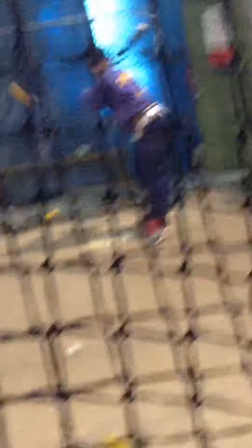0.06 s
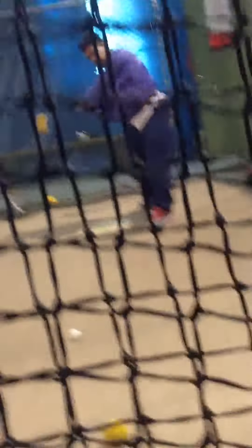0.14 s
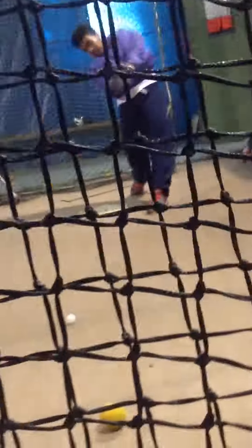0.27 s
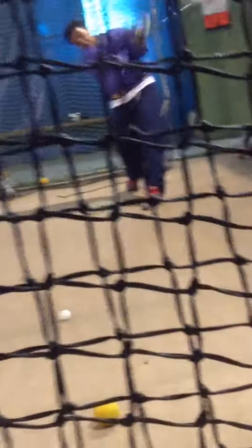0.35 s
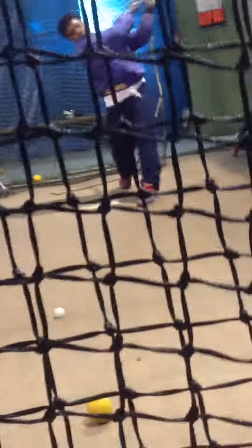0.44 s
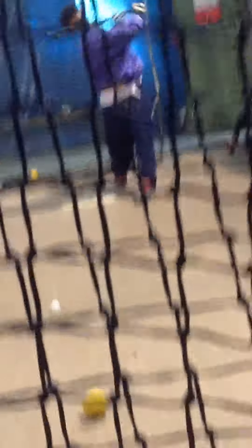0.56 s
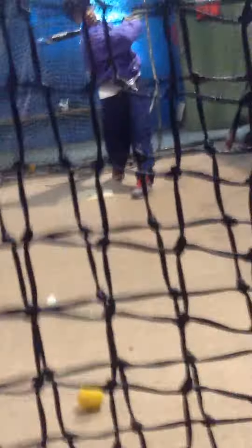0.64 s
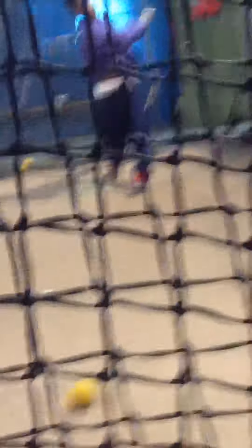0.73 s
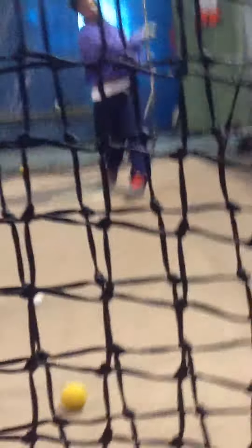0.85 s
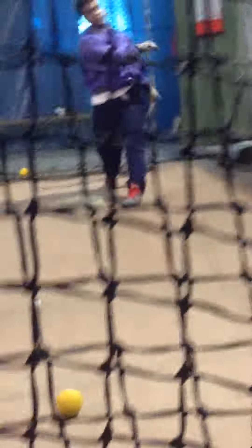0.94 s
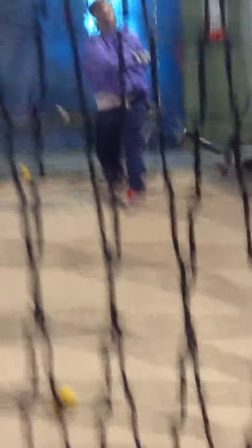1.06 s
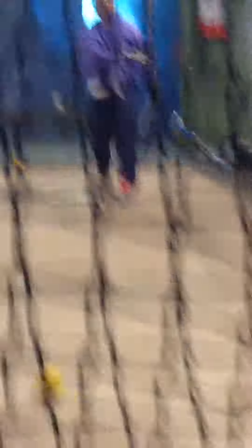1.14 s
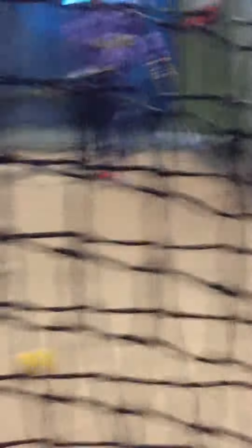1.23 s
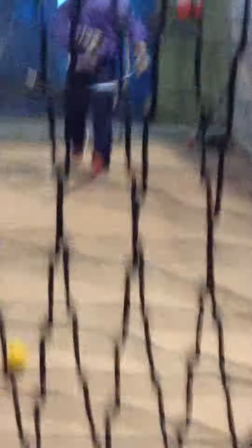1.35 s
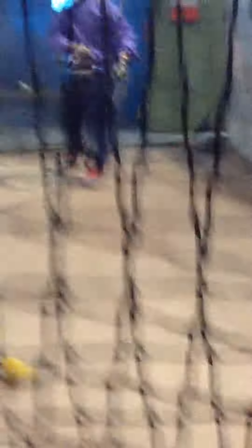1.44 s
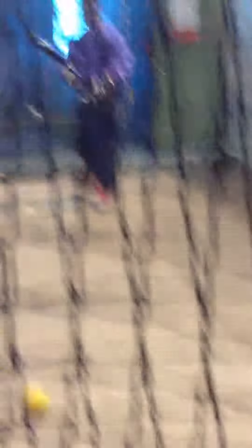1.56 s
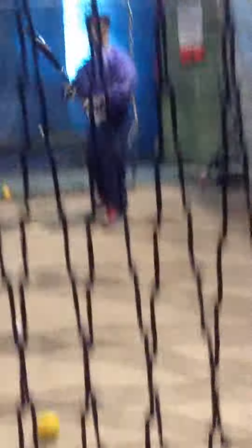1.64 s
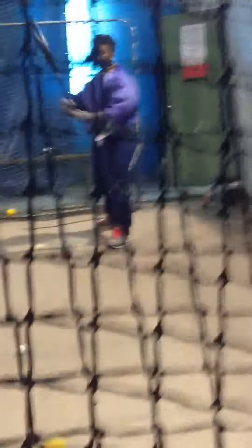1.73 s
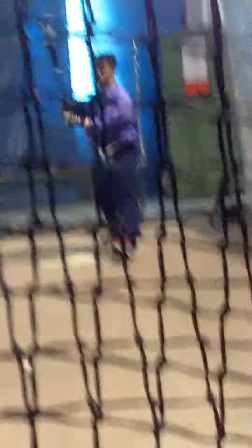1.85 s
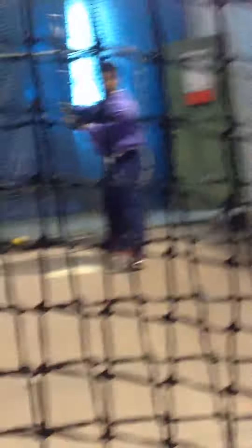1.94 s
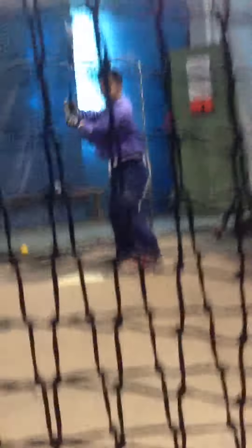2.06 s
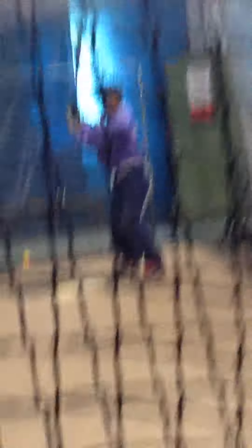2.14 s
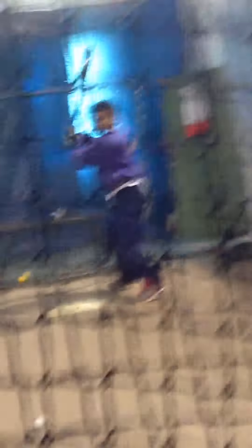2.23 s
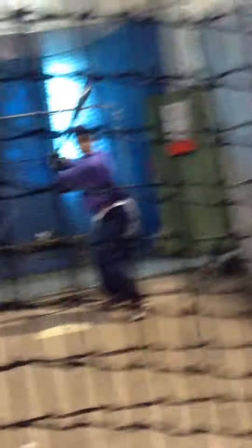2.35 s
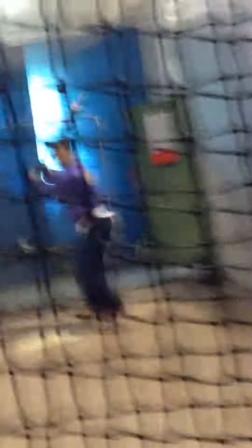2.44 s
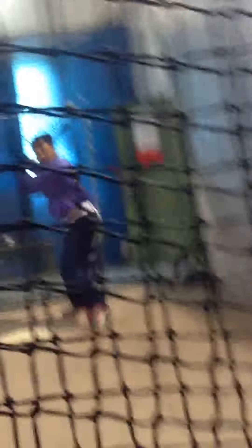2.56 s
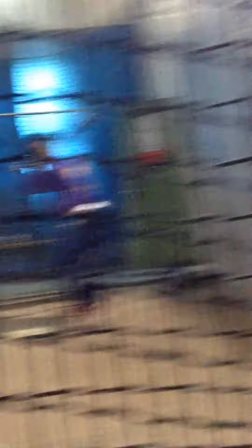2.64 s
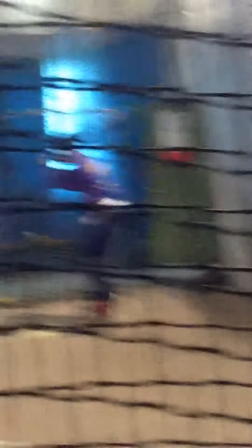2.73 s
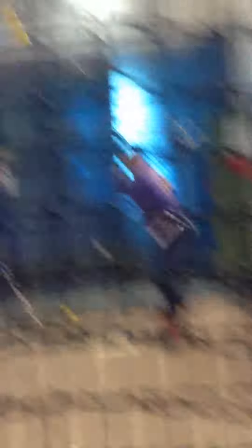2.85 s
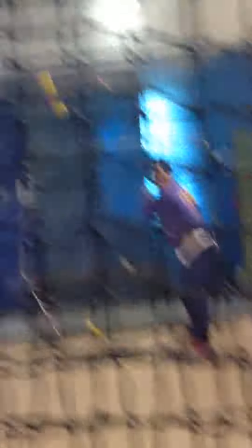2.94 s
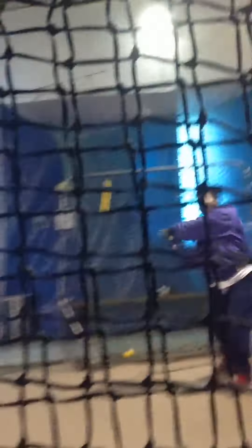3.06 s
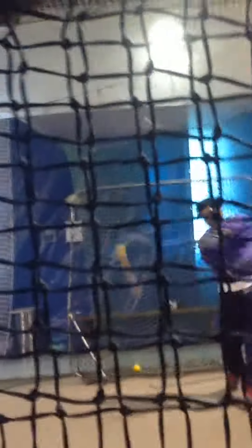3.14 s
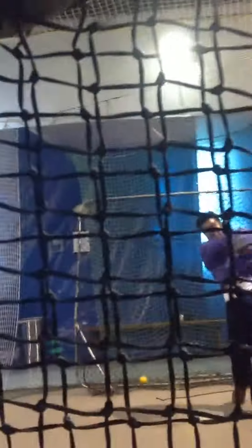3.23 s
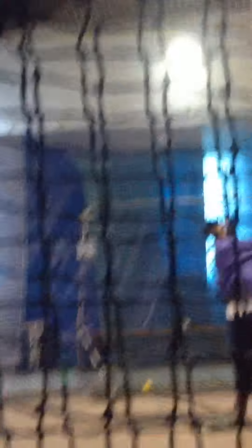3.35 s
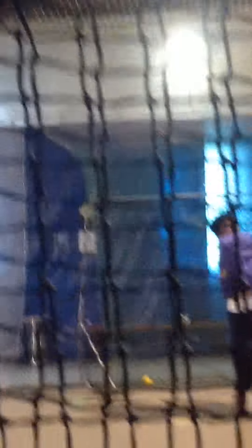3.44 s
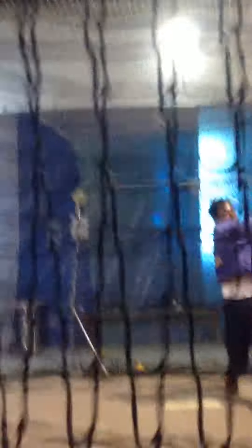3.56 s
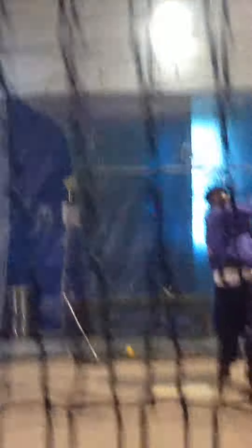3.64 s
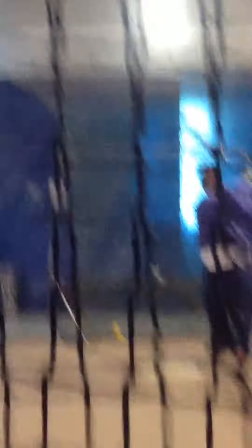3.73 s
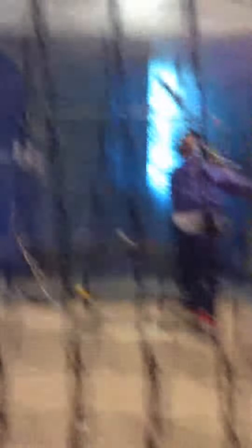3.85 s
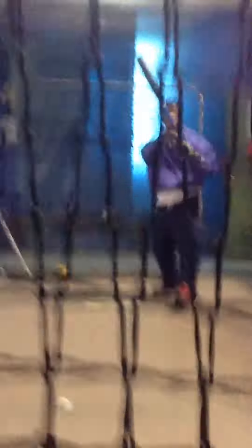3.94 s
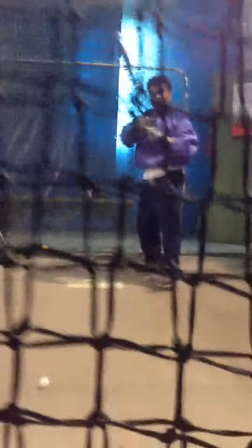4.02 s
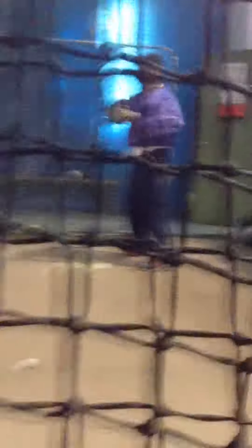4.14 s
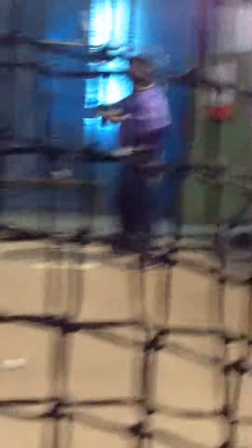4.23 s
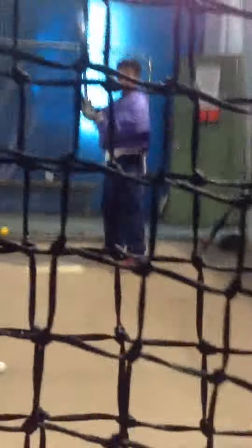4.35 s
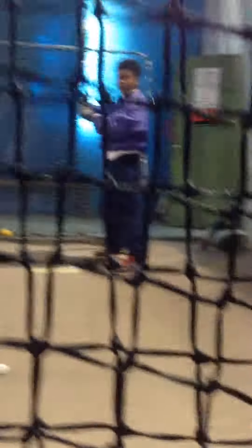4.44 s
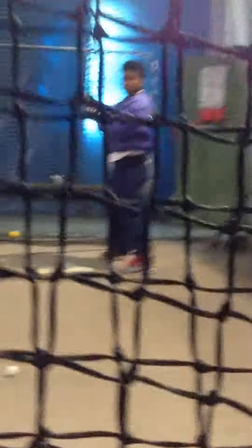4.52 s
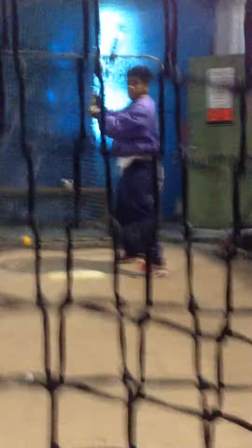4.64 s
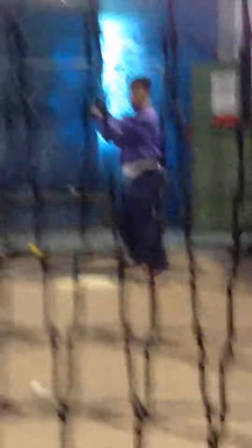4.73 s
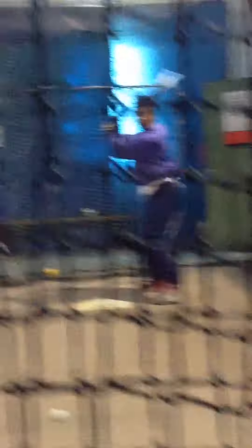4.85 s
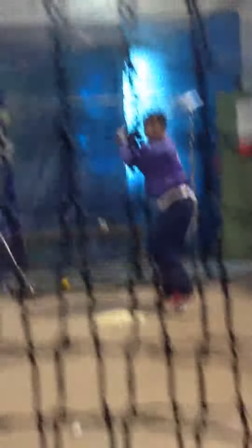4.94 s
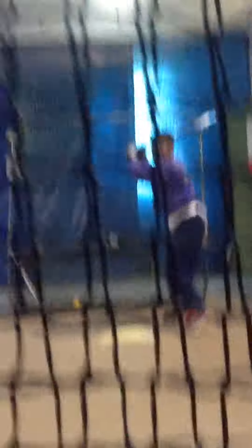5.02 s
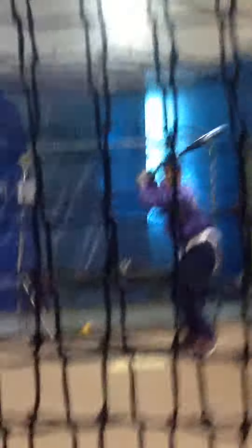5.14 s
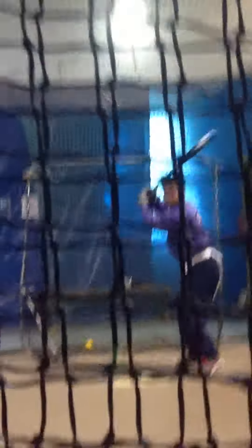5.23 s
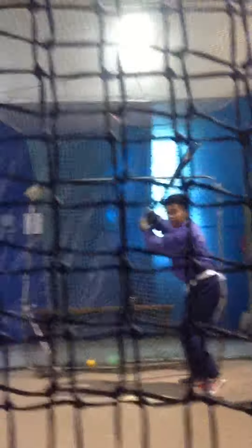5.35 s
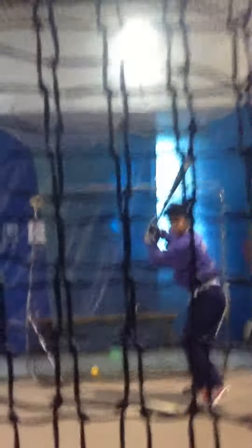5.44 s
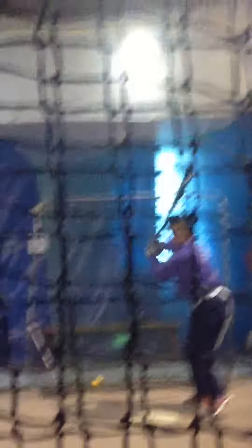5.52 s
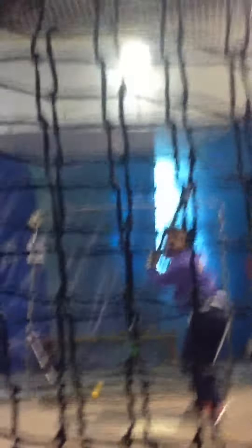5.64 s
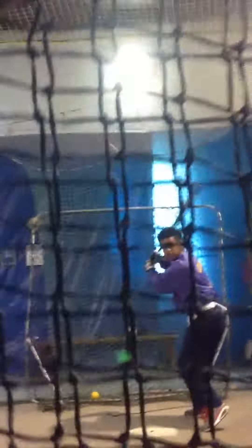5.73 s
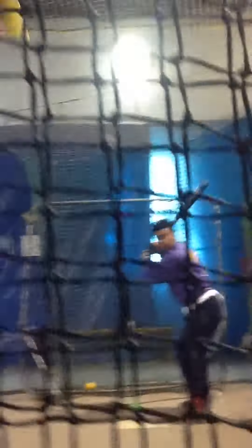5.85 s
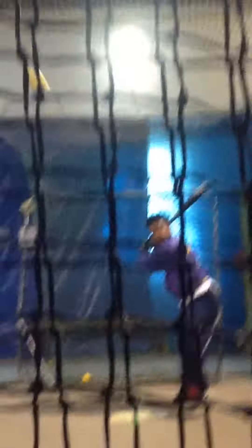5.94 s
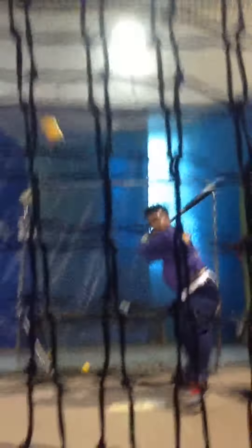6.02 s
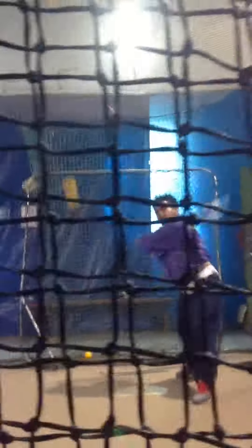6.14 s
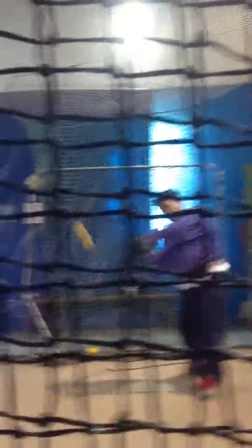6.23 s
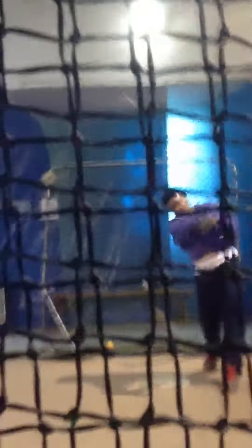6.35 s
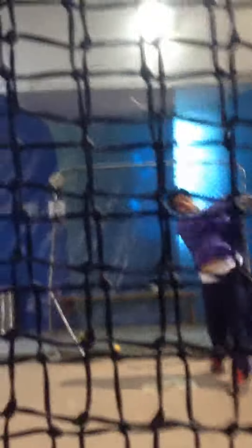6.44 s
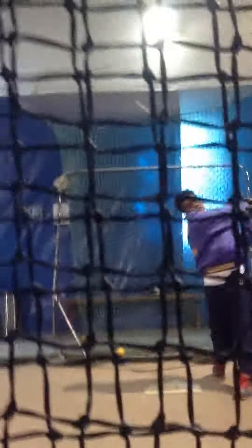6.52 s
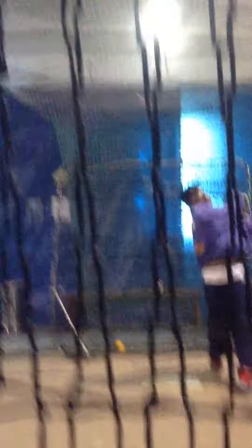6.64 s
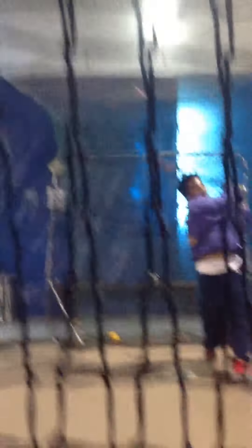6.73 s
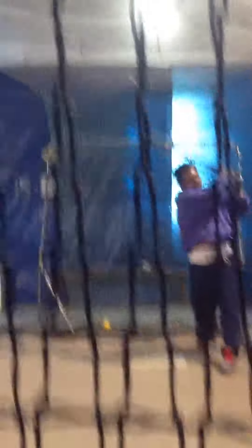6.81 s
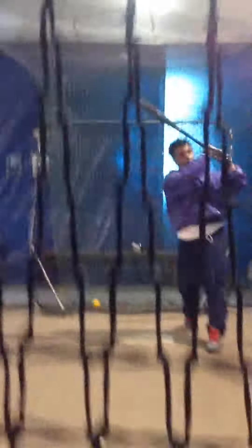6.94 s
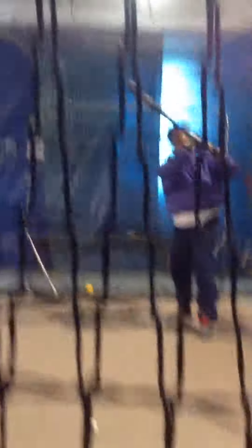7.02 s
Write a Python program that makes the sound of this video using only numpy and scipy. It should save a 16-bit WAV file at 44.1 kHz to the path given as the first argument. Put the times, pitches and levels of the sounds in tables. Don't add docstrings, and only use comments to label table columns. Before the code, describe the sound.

Three sharp bat cracks ring through a bare indoor batting cage, with foam balls slapping the net, bouncing balls, scuffing shoes and a low machine rumble.

```python
import sys
import numpy as np
from scipy import signal
from scipy.fft import rfft, irfft
from scipy.io import wavfile
from scipy.ndimage import uniform_filter1d, map_coordinates

SR = 44100
rng = np.random.default_rng(int(sys.argv[2]) if len(sys.argv) > 2 else 0)


def master(y):
    cut = np.clip(np.atleast_2d(y).T, -1, 1)
    pcm = np.round(cut * 32767)
    wavfile.write(sys.argv[1], SR, pcm.astype(np.int16))


def amplitude_ratio(level_db):
    exponent = np.asarray(level_db, float) / 20
    return 10 ** exponent


N = 312210
T = np.arange(int(1.6 * SR)) / SR
TIME = np.arange(N) / SR


def unit(x):
    return x / np.sqrt(np.mean(x ** 2) + 1e-20)


def along(points, hz):
    f, v = np.transpose(points)
    return np.interp(np.log(hz + 1), np.log(f + 1), v)


def wobble(rate):
    knots = rng.standard_normal(int(N * rate / SR) + 4)
    return map_coordinates(knots, [np.arange(N) * rate / SR])


def patches(shape, bins, frames):
    field = uniform_filter1d(rng.standard_normal(shape), bins, 0)
    return unit(uniform_filter1d(field, frames, 1))


def add(track, s, sound):
    part = track[round(s * SR):][:len(sound)]
    part += sound[:len(part)]


def ring(hz, db, t60, rise=0.0001):
    return amplitude_ratio(db - 60 * T / t60) * np.sin(2 * np.pi * hz * T) * (1 - np.exp(-T / rise))


def rush(spectrum, patchy_db):
    hz, _, z = signal.stft(rng.standard_normal(N), SR, nperseg=2048)
    gain_db = along(spectrum, hz)[:, None] + patchy_db * patches(z.shape, 12, 4)
    return unit(signal.istft(z * amplitude_ratio(gain_db), SR, nperseg=2048)[1][:N])


# (frequency [Hz], t60 [s])
HALL_DECAY = [(100, 1.57), (260, 0.89), (700, 0.73), (1800, 0.9), (5000, 0.89), (13000, 0.46)]


def hall(spectrum, gap, sparse=0.75, bass_db=0, treble_db=0, shrink=0.97, lumpy_db=1.5):
    spikiness = sparse * np.exp(-T / 0.064)
    spikes = np.exp(spikiness * rng.standard_normal(len(T)) - sparse ** 2 * np.exp(-T / 0.044))
    hz, t, z = signal.stft(rng.standard_normal(len(T)) * spikes, SR, nperseg=512)
    lumps = patches(z.shape, 4, 4)
    bass = bass_db / (1 + (hz / 500) ** 4)
    treble = treble_db / (1 + (6500 / (hz + 1)) ** 4)
    colour = along(spectrum, hz) + bass + treble
    decay_db = -60 * t / (shrink * along(HALL_DECAY, hz)[:, None])
    tail = signal.istft(z * amplitude_ratio(colour[:, None] + decay_db + lumpy_db * lumps), SR, nperseg=512)[1][:len(T)]
    loud = np.sqrt(np.mean(amplitude_ratio(along(spectrum, hz)) ** 2))
    return tail / loud * np.clip(T / gap, 0, 1) ** 2


# (time [s], floor echo delay [ms], echo level [dB], hall level [dB], low room mode level [dB])
HITS = [
    (.33341, .72, -4.5, -22, -25),
    (3.24556, 1.3, -1, -24, -29),
    (6.39126, 1.08, -6, -23, -32),
]
# (frequency [Hz], level [dB], t60 [s])
BARREL_MODES = [(533, -11.5, 0.0083), (1215, -19.5, 0.028), (1500, -32, 0.057), (2970, -24, 0.034)]
# (delay [ms], level [dB])
WALL_ECHOES = [(4.6, -18), (6.0, -22), (11.4, -12), (14.4, -17), (17.7, -13), (20.5, -16), (26.5, -16)]
# (frequency [Hz], level [dB per Hz])
BAT_HALL_COLOUR = [(41, -58), (70, -71), (178, 1.5), (262, 6), (321, -0.5), (441, 2), (797, -7),
                   (913, -13.5), (1370, -15), (1510, -18), (1810, -19), (3330, -18.5), (13000, -24),
                   (14900, -32), (16000, -46)]


def bat():
    out = np.zeros(N)
    suction = 1.25 * np.exp(-((T - .0001) / .00003) ** 2)
    rebound = .12 * np.exp(-((T - .00023) / .00004) ** 2)
    blow = rebound - suction + sum(ring(*mode) for mode in BARREL_MODES)
    for s, echo_ms, echo_db, hall_db, mode_db in HITS:
        add(out, s - .0001, blow)
        add(out, s - .0001 + echo_ms / 1000, amplitude_ratio(echo_db) * blow)
        for ms, wall_db in WALL_ECHOES:
            late = rng.uniform(1.0, 1.03)
            add(out, s + ms / 1000 * late, amplitude_ratio(wall_db + rng.normal(0, 1.9)) * blow)
        bass_db = -7 + 0.72 * (mode_db + 28)
        add(out, s, amplitude_ratio(hall_db + 4.5) * hall(BAT_HALL_COLOUR, gap=0.0014, bass_db=bass_db))
        add(out, s, ring(212, mode_db, 0.99, rise=0.1))
    return out


# (frequency [Hz], level [dB per Hz])
BOUNCE_HALL_COLOUR = [(41, -64), (70, -39), (136, -15), (178, -1), (353, -3.5), (471, -31), (750, -40),
                      (838, -11), (2270, -0.5), (7360, -19), (10000, -28.5), (12500, -51)]
# (time [s], click level [dB], thump level [dB], knock level [dB], knock pitch [Hz])
FIRST_TOSS = [
    (1.41345, -11, -4, -16.5, 745),
    (2.1296, -32, 1, 7.5, 896),
    (2.58625, -24, -20.5, -13.5, 805),
    (2.8748, -28, -45, -23, 1900),
]
# (time [s], click level [dB], thump level [dB], knock level [dB], knock pitch [Hz])
SECOND_TOSS = [
    (4.69515, -9, -15.5, -16, 530),
    (5.2407, -18.5, -7.5, -37, 830),
    (5.6136, -28, -15, -24, 1500),
    (5.85, -34, -5.5, -6, 1400),
    (5.9819, -41.5, -19, -4, 970),
]


def bounces(rows, skin_hz, echo_ms):
    out = np.zeros(N)
    thud_colour = [(60, -70), (110, -30.5), (170, 2), (300, -6), (450, -44.5), (900, -80)]
    for k, (s, db, thump_db, knock_db, knock_hz) in enumerate(rows):
        cycles = skin_hz * 0.86 ** k * (T - .001)
        click = 1.1 * np.exp(-(cycles / .52) ** 2) * np.cos(2 * np.pi * cycles + .5)
        click += .3 * np.exp(-((T - .001) / .00005) ** 2)
        add(out, s - .001, amplitude_ratio(db) * click)
        echo_db = -6.5 - 5 * k
        add(out, s - .001 + echo_ms / 1000, -amplitude_ratio(db + echo_db) * click)
        thump = ring(241, thump_db + 15.5, 0.018, rise=0.0066)
        knock = ring(knock_hz, knock_db + 1.0, 0.014)
        add(out, s, amplitude_ratio(db) * (thump + knock))
        hollow = [(knock_hz / 8, -70), (knock_hz / 3, -30), (0.62 * knock_hz, -3), (knock_hz, 0),
                  (1.24 * knock_hz, -6), (3 * knock_hz, -40), (8 * knock_hz, -80)]
        add(out, s, amplitude_ratio(db + knock_db - 24.0) * hall(hollow, gap=0.009, shrink=0.73))
        add(out, s + 0.01517, amplitude_ratio(db + thump_db - 27.5) * hall(thud_colour, gap=0.0044, shrink=1.0))
        add(out, s, amplitude_ratio(db - 21) * hall(BOUNCE_HALL_COLOUR, gap=.002, shrink=.05, treble_db=6))
        tail = hall(BOUNCE_HALL_COLOUR, gap=0.0052, bass_db=thump_db + 16, treble_db=0.3 * (db + 15.5), shrink=0.65)
        add(out, s + .012, amplitude_ratio(db - 27.5) * tail)
    return out


def tosses():
    return bounces(FIRST_TOSS, skin_hz=3030, echo_ms=3.7) + bounces(SECOND_TOSS, skin_hz=2730, echo_ms=2.08)


def contacts(rows, colour, rise, burst, thump_hz, usual_db):
    out = np.zeros(N)
    for s, db, thump_db, bright_db, hall_db in rows:
        treble_db = bright_db - usual_db
        crackle = hall(colour, gap=rise, treble_db=treble_db) * amplitude_ratio(-60 * T / burst)
        thump = ring(thump_hz, thump_db, 0.099, rise=0.0015)
        add(out, s, amplitude_ratio(db - 5) * crackle + amplitude_ratio(db) * thump)
        tail = hall(colour, gap=0.014, treble_db=treble_db, shrink=0.73)
        add(out, s, amplitude_ratio(db + hall_db - 6.5) * tail)
    return out


# (time [s], peak level [dB], thump level [dB], brightness [dB], hall level [dB])
SLAPS = [
    (.487, -25.5, 0, -5.5, -26),
    (1.5057, -59, 23, -28, -13.5),
    (3.3471, -18.5, -8, -14, -15),
    (3.5988, -15, -43, -10.5, -12.5),
    (6.5079, -17, -14, -11, -15.5),
    (6.6722, -22, -15, -11, -12),
]
# (frequency [Hz], level [dB per Hz])
SLAP_TONE = [(180, -33), (300, -4), (961, -1.5), (1100, -3), (1460, -1), (2930, -8.5), (13100, -6),
             (15200, -15), (16000, -43)]


def slaps():
    return contacts(SLAPS, SLAP_TONE, rise=0.00071, burst=0.037, thump_hz=256, usual_db=-3.5)


# (time [s], peak level [dB], frequency [Hz], t60 [s])
FRAME_MODES = [
    (3.5994, -13, 1450, 0.0051),
    (3.5994, -23, 5700, 0.0094),
    (3.5994, -26, 10500, 0.0091),
]


def frame():
    out = np.zeros(N)
    for s, db, hz, t60 in FRAME_MODES:
        add(out, s, -ring(hz, db, t60))
    return out


# (time [s], peak level [dB], brightness [dB], hall level [dB])
SCUFFS = [(0.8851, -39, -44, -5.5), (0.9294, -58, -24, -16), (2.0007, -52.5, -12, -7),
          (2.148, -51.5, -15, -6), (3.9557, -51, -13, -14), (3.9938, -43.5, -26, -6.5),
          (4.0482, -44.5, -20, -11), (4.28, -46.5, -31, 0), (4.3022, -48, -11, -16),
          (4.5517, -40, -22, -12), (4.5651, -46, -28, -5), (5.66, -59, -19, -19)]
# (frequency [Hz], level [dB per Hz])
SCUFF_TONE = [(710, -20), (1200, -5), (2000, -8), (2200, -6.5), (4600, -11), (5590, -19.5), (14500, -29),
              (16000, -37)]


def scuffs():
    rows = [(s, db, -21, bright_db, hall_db) for s, db, bright_db, hall_db in SCUFFS]
    return contacts(rows, SCUFF_TONE, rise=0.0021, burst=0.055, thump_hz=336, usual_db=-21.0)


# (time [s], peak level [dB], frequency [Hz], t60 [s])
STEPS = [(1.12, -44, 204, 0.023), (2.508, -41, 176, 0.04), (4.244, -39, 775, 0.031),
         (4.252, -43, 217, 0.026), (4.402, -56, 167, 0.074), (4.451, -39.5, 344, 0.034),
         (4.451, -33.5, 890, 0.0098), (4.623, -47, 168, 0.085), (5.757, -38, 216, 0.016),
         (5.944, -42, 188, 0.034), (6.192, -40.5, 214, 0.21), (6.194, -43, 800, .015)]
# (time [s], peak level [dB], frequency [Hz], t60 [s])
PLANTS = [
    (.310, -39, 215, .12),
    (3.236, -43, 330, .04),
]


def steps():
    out = np.zeros(N)
    for s, db, hz, t60 in STEPS + PLANTS:
        body = ring(hz, db - 0.5, t60, rise=0.00054)
        add(out, s, body + ring(2.2 * hz, db - 10, t60 / 3) + ring(4.3 * hz, db - 18.5, t60 / 5))
    return out


# (time [s], pitch [Hz], peak level [dB], loudest frequency [Hz], fall [dB per octave])
SQUEAKS = [
    (3.828, 2240, -34, 2240, -5.5),
    (4.052, 2240, -50, 2240, -12),
    (4.285, 935, -55, 3740, -18),
    (4.308, 935, -53, 3740, -11),
]


def squeaks():
    out = np.zeros(N)
    t = T[:SR // 10] - .04
    for s, hz, db, top_hz, fall_db in SQUEAKS:
        slips = t * hz / 14
        jitter = .02 * unit(uniform_filter1d(rng.standard_normal(len(t)), 90))
        flutter_db = 2.5 * unit(uniform_filter1d(rng.standard_normal((12, len(t))), 200))
        phase = 2 * np.pi * np.cumsum(hz * (1 + .027 * np.tanh(slips) + jitter)) / SR
        stack = np.zeros(len(t))
        for k in range(1, 13):
            level_db = fall_db * abs(np.log2(k * hz / top_hz)) + flutter_db[k - 1]
            stack += amplitude_ratio(level_db) * np.sin(k * phase) / (1 + (k * hz / 8500) ** 7)
        chirp = amplitude_ratio(db) * stack * np.exp(-np.abs(slips / np.where(t < 0, .6, 1)))
        add(out, s - .04, chirp)
        room = hall([(2000, -7.5), (4500, -5), (12000, -6)], gap=0.004, shrink=0.42)
        add(out, s - .04, amplitude_ratio(-36) * signal.fftconvolve(chirp, room))
    return out


def swing():
    return sum(amplitude_ratio(2 * (hall_db + 20.5)) * np.exp(-np.abs(TIME - s) / 0.033) for s, _, _, hall_db, _ in HITS)


def shuffle():
    return sum(np.exp(-((TIME - s) / 0.093) ** 2) for s, *_ in SCUFFS + STEPS) ** .5


# (time [s], rumble level [dB])
MACHINE_LOAD = [(0, -62), (.3, -58.5), (1.05, -62), (1.4, -66.5), (1.75, -63), (2.05, -64), (2.23, -57),
                (2.62, -59.5), (3.1, -53), (3.3, -63.5), (3.95, -64.5), (4.5, -62.5), (4.7, -56.5),
                (5.1, -58.5), (5.6, -58), (6.3, -53.5), (6.98, -59), (7.08, -62)]
# (frequency [Hz], level [dB per Hz])
RUMBLE_COLOUR = [(24, -55), (40, -16), (85, -8), (99, -27), (107, -32), (139, -6.5), (181, -4.5), (211, 0),
                 (231, -1), (339, -19), (450, -28.5), (580, -62.5), (990, -120)]
# (frequency [Hz], level [dB per Hz])
RUSH_COLOUR = [(210, -38.5), (350, -5.5), (433, -15.5), (574, -3), (691, -3.5), (833, -4), (1020, -6),
               (1500, -7.5), (2040, -12.5), (4360, -16.5), (4720, -21.5), (5260, -18), (8500, -47),
               (11000, -31), (18700, -120)]
# (frequency [Hz], level [dB per Hz])
HISS_COLOUR = [(4500, -30), (6500, -3), (7600, -6), (10000, -8), (13400, -10), (14800, -12), (15400, -17)]


def air():
    load_db = np.interp(TIME, *np.transpose(MACHINE_LOAD))
    whoosh, rustle = swing(), shuffle()
    rumble = amplitude_ratio(load_db + .8 * wobble(9)) * rush(RUMBLE_COLOUR, patchy_db=.8)
    fan_db = -59 + 0.35 * (load_db - load_db.mean()) + .7 * wobble(6)
    fan = amplitude_ratio(fan_db) + amplitude_ratio(-48) * whoosh + amplitude_ratio(-78) * rustle
    hiss = amplitude_ratio(-78) + amplitude_ratio(-51) * whoosh + amplitude_ratio(-95.5) * rustle
    return rumble + fan * rush(RUSH_COLOUR, patchy_db=0.9) + hiss * rush(HISS_COLOUR, patchy_db=-0.3)


# (frequency [Hz], level [dB])
LAMP_TONES = [(4538, -84), (5098, -85), (5222, -84), (5636, -85), (5879, -84), (6239, -84), (6358, -83),
              (6481, -83), (6600, -90), (6718, -82)]
# (frequency [Hz], level [dB])
MAINS_HUM = (119.8, -73.5)


def lamps():
    out = np.zeros(N)
    for hz, db in LAMP_TONES:
        out += amplitude_ratio(db - 1.5 + 5 * wobble(2.5)) * np.sin(2 * np.pi * hz * TIME + 1.3 * wobble(30))
    hz, db = MAINS_HUM
    return out + amplitude_ratio(db + 5.0) * np.sin(2 * np.pi * hz * TIME + 0.242 * wobble(3.77))


# (start [s], length [s], level [dB])
WHINE_SPELLS = [
    (0, 1.2, -84),
    (3.8, .45, -77),
    (5.32, .6, -69),
]


def whine():
    spells = amplitude_ratio(-89)
    for s, length, db in WHINE_SPELLS:
        inside = np.minimum(TIME - s, s + length - TIME)
        spells = spells + amplitude_ratio(db) * np.clip(inside / .06 + 1, 0, 1)
    tones = np.zeros(N)
    for k in (-1, 0, 1):
        tones += amplitude_ratio(-3 * abs(k)) * np.sin(2 * np.pi * (5281 + 59 * k) * TIME + .8 * wobble(25))
    return spells * amplitude_ratio(1.5 * wobble(8) - 3) * tones


def scene():
    blows = bat() + tosses() + slaps() + frame()
    feet = scuffs() + steps() + squeaks()
    return (blows + feet + air() + lamps() + whine())[None]


def low_pass(x):
    return signal.sosfilt(signal.butter(12, 16500, fs=SR, output="sos"), x)


def record(dry):
    high_pass = signal.butter(5, 125, "high", fs=SR, output="sos")
    wet = signal.sosfilt(high_pass, dry) + amplitude_ratio(-35.0) * dry
    wet = irfft(rfft(wet) * (np.fft.rfftfreq(N, 1 / SR) < 15380), N)
    return low_pass(wet)


dry = scene()
out = record(dry)
master(out)
```